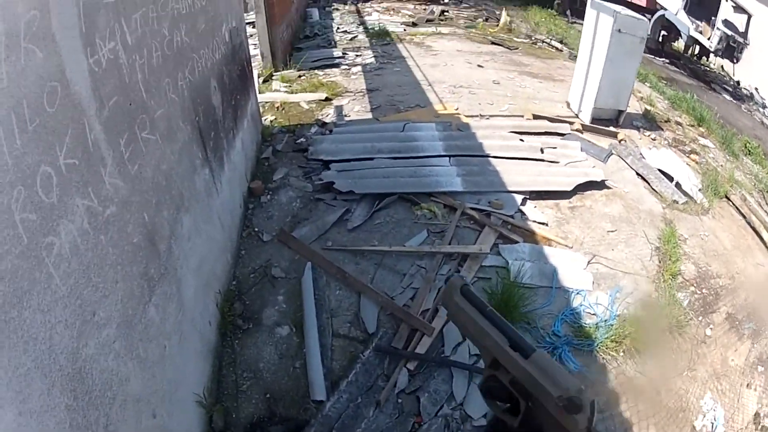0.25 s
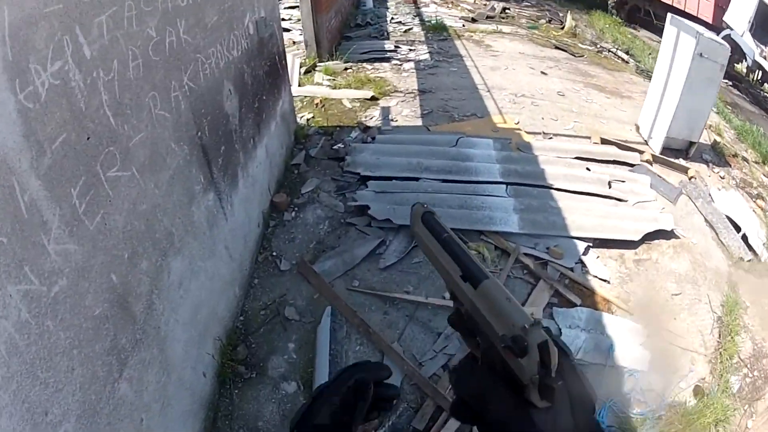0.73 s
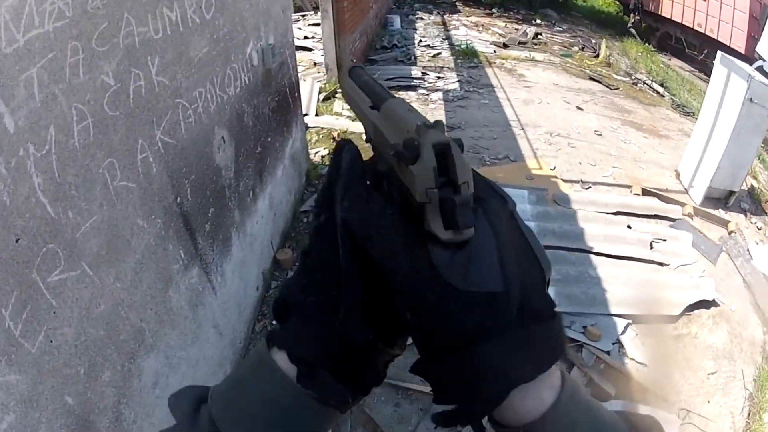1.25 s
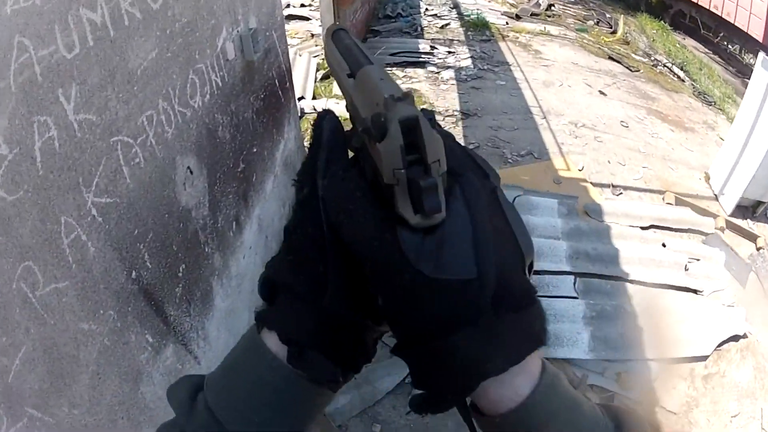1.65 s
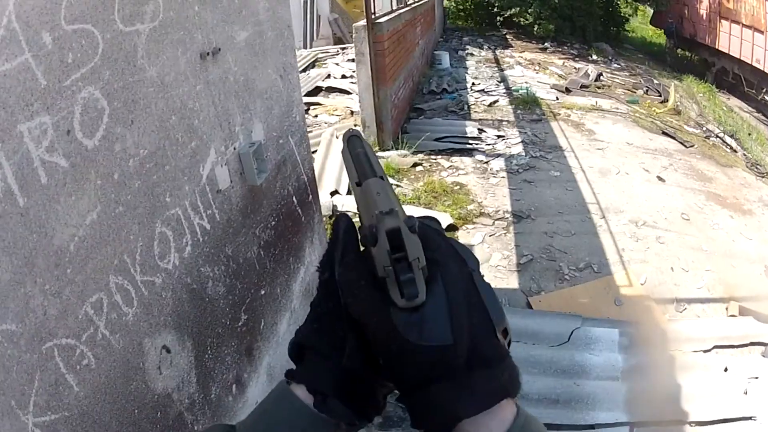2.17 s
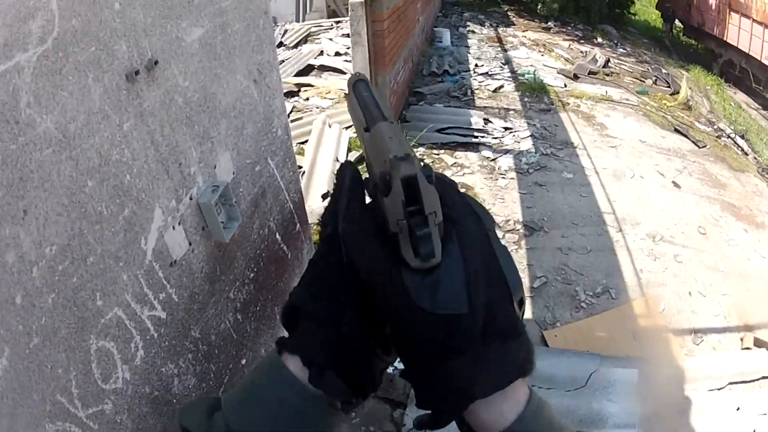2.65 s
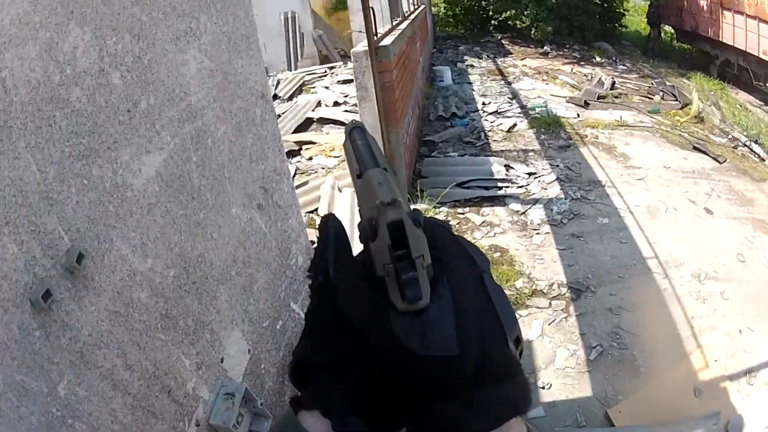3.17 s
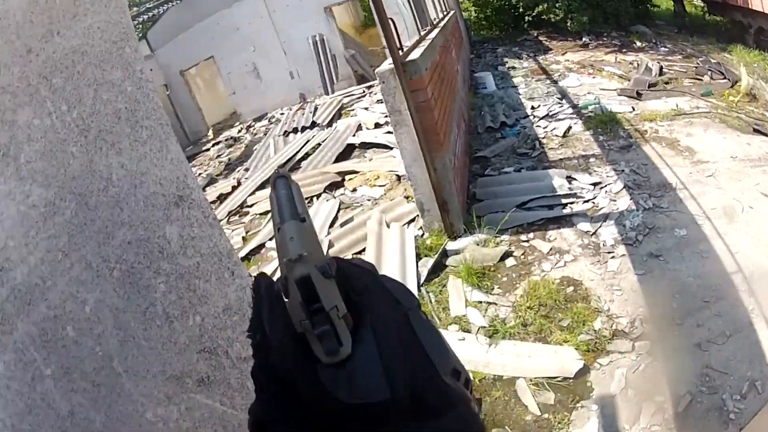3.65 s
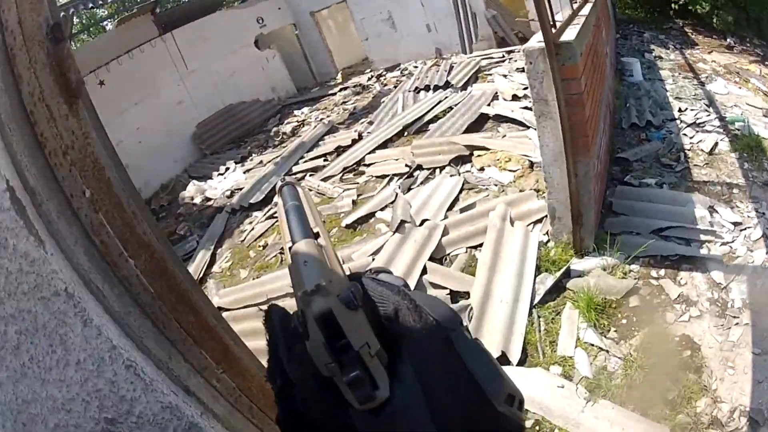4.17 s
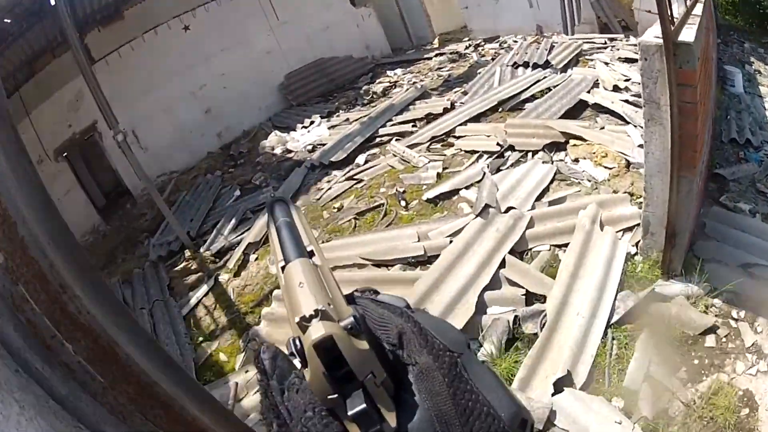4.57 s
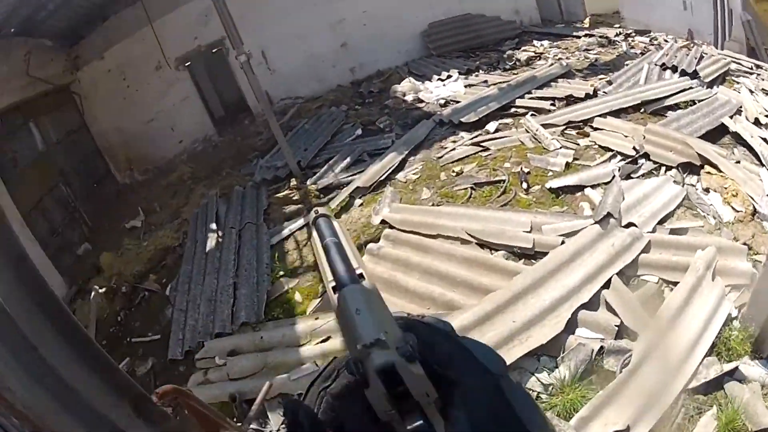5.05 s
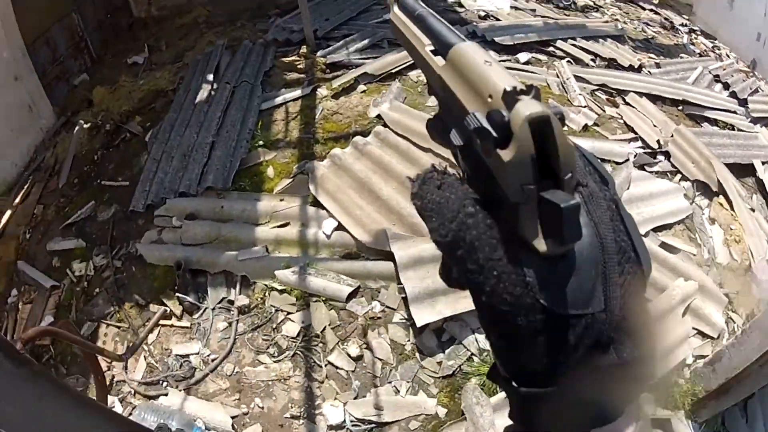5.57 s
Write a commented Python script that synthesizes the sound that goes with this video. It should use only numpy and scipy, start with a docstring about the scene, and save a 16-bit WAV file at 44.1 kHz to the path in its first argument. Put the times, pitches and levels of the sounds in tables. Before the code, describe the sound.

Someone walks slowly over broken corrugated fibre-cement sheets and rubble in an open ruin, heard from a head-worn camera. From 0.1 to 0.7 seconds there are small dry snaps, light knocks and faint grit shuffling, then a near pause. A firmer step lands around 1.4 to 1.6, with hollow mid-pitched clunks and crunching. The loudest moment comes at 2.1 to 2.4: a rapid clatter of sheets, sharp cracks and crushed grit. More knocks follow at 2.6 to 2.7 and 2.9 to 3.2, including a distinct clack near 3.15. Softer clunks at 3.6 to 3.9 give way to sparse clicks and a slight shift near 5.15. A very faint even tick, about ten a second, runs from 4.2 to the end. Low body thumps, wind rumble, distant airy noise and barely audible thin bird whistles lie beneath, with a short diffuse echo and slightly gritty treble.

```python
"""Beside a ruined wall, boots tread on loose fibre-cement sheets and rubble, heard by a head-worn camera.
Blows ring the sheets, shards crack in short noise bursts, and grit crunches as dense random clicks.
Steps thump through the body as low pulses; an even tick and thin bird whistles are faint behind them.
Shaped noise makes the distant air and the wind rumbling on the camera's housing.
The recorder holds each of its 12000 samples a second, so the sound is mirrored into the treble."""
import sys
import numpy as np
from scipy import signal
from scipy.fft import rfft, irfft, next_fast_len
from scipy.io import wavfile
from scipy.ndimage import uniform_filter1d

SR = 44100
rng = np.random.default_rng(int(sys.argv[2]) if len(sys.argv) > 2 else 0)


def log_audio(samples):
    """Write samples as a 16-bit WAV file to the path given in sys.argv[1]."""
    # one column per channel
    frames = np.atleast_2d(samples).T
    # limit to full scale, then quantise
    limited = np.clip(frames, -1, 1)
    pcm = np.round(limited * 32767).astype(np.int16)
    wavfile.write(sys.argv[1], SR, pcm)


N = 256220
FAST = next_fast_len(N)  # a length that the Fourier transform handles quickly
CRACK_RISE_S = 0.00037

# The ways a sheet can ring. Each row: pitch in Hz, relative level in dB.
SHEET_MODES = [(230, -6), (313, -3), (380, -0.5), (427, -3), (466, -1.5), (539, -4), (616, -2), (684, -2.5),
               (733, -7), (798, -8), (947, -14.5), (1115, -19.5)]
# A sole pressing into the debris. Each row: start in seconds, seconds from the start until it lets go,
# sheet rattle level in dB, grit level in dB.
SOLE_PRESSES = [(0.168, 0.045, -46.5, -65), (0.317, 0.045, -55, -58), (0.432, 0.069, -49.5, -78),
                (0.598, .1, -43.5, -60.5), (0.714, 0.12, -45.5, -56), (1.376, 0.041, -24, -54),
                (1.431, 0.075, -30.5, -46.5), (1.532, 0.04, -29.5, -35.5), (2.102, 0.018, -26, -35),
                (2.131, 0.015, -15, -21.5), (2.164, 0.076, -19.5, -53), (2.214, 0.04, -17.5, -37),
                (2.257, 0.076, -24.5, -44), (2.338, 0.047, -27, -49), (2.424, 0.062, -46, -64),
                (2.619, 0.034, -31, -49.5), (2.68, 0.078, -38, -53), (2.912, 0.055, -32.5, -42),
                (2.97, 0.056, -36, -41), (3.024, 0.15, -41.5, -61.5), (3.154, 0.029, -32.5, -49),
                (3.592, .03, -47, -64), (3.689, 0.12, -44, -64), (3.842, 0.046, -43.5, -81),
                (4.378, 0.16, -53.5, -73), (5.133, .1, -55, -68)]
# Debris shifting between the steps. Each row: time in seconds, sheet rattle level in dB, grit level in dB.
QUIET_SHUFFLE = [(0, -54.5, -73), (0.4, -51.5, -66), (0.95, -51, -66.5), (1.15, -65, -77),
                 (1.6, -58, -64.5), (1.85, -52, -66), (2.0, -64, -75), (2.5, -67, -71), (2.8, -48, -62.5),
                 (3.3, -53.5, -65.5), (3.5, -56, -68.5), (3.9, -54.5, -66.5), (4.1, -70, -71),
                 (5.0, -60, -71), (5.81, -63.5, -66.5)]


def undb(db):
    """Turns decibels into a plain gain."""
    return 10 ** (np.asarray(db) / 20)


def unit(x):
    """Scales to an rms (average strength) of 1."""
    return x / np.sqrt(np.mean(x ** 2))


def fade(t, t60):
    """Dies away exponentially, by 60 dB in t60 seconds."""
    return np.exp(-np.log(1000) * t / t60)


def colour(x, table):
    """Shapes the spectrum with a gain curve through (Hz, dB) points."""
    hz, db = np.transpose(table)
    f = np.fft.rfftfreq(FAST, 1 / SR) + 1  # 1 Hz up, to avoid the log of zero
    gain = undb(np.interp(np.log(f), np.log(hz), db))
    return irfft(rfft(x, FAST) * gain, FAST)[:N]


def band(x, hz, width_hz):
    """Rings like a single resonance, with gain 1 at its centre."""
    return signal.lfilter(*signal.iirpeak(hz, hz / width_hz, fs=SR), x)


def add(out, s, x, db):
    """Mixes x in at s seconds, with its peak at db."""
    i = int(s * SR)
    x = x[:N - i]
    out[i:i + len(x)] += x * undb(db) / np.abs(x).max()


def walk(rate):
    """Wanders smoothly between random levels, drawn rate times a second."""
    k = int(SR / rate)
    levels = rng.standard_normal(N // 64)
    held = levels[np.arange(N) // k]
    return 0.67 * uniform_filter1d(uniform_filter1d(held, k), k)


def grains(rate, spread_db):
    """Scatters random clicks, rate a second on average: most small, a few large."""
    size = undb(spread_db * rng.exponential(size=N)) * rng.standard_normal(N)
    return size * (rng.random(N) < rate / SR)


def knocks(focus=0.27, scatter_db=5.5):
    """Each blow rings the sheet modes nearest to where it lands; the top mode has its own level."""
    # Blows on the sheets. Each row: start in seconds, peak level in dB, centre of the ring in Hz,
    # top mode level in dB against the other modes summed, ring time to fall 60 dB in seconds.
    blows = [(0.127, -32.5, 552, -35, 0.033), (0.21, -36, 678, -37, 0.022), (0.35, -31, 690, -41, 0.11),
             (0.502, -32, 600, -30, 0.049), (0.598, -33, 257, -30, 0.028), (0.644, -34, 780, -20, 0.016),
             (0.657, -36, 493, -35, 0.1), (0.689, -29.5, 580, -44, .047), (0.939, -32, 393, -51, 0.059),
             (1.202, -21.5, 473, -27.5, 0.027), (1.373, -17.5, 460, -31, 0.012),
             (1.387, -12.5, 420, -32, 0.038), (1.449, -20.5, 470, -29, 0.055),
             (1.479, -22.5, 554, -29, 0.039), (1.548, -18, 515, -44, 0.028), (1.569, -31, 574, -37, 0.073),
             (1.916, -36, 523, -42, 0.043), (2.116, -10, 586, -33, 0.092), (2.136, -2, 700, -13.5, 0.068),
             (2.16, -8, 740, -27, 0.052), (2.224, -2.5, 412, -37, 0.11), (2.238, -13.5, 360, -32, 0.077),
             (2.255, -29, 446, -36, 0.11), (2.295, -23.5, 344, -39, 0.14), (2.314, -16.5, 376, -31, 0.17),
             (2.358, -8, 527, -47, 0.058), (2.384, -16, 405, -46, 0.13), (2.409, -20.5, 400, -55, 0.22),
             (2.623, -27.5, 594, -42, 0.056), (2.631, -16.5, 365, -54, 0.054), (2.69, -29, 403, -42, 0.052),
             (2.721, -19.5, 480, -45, 0.015), (2.916, -33.5, 720, -24, 0.11),
             (2.937, -18, 514, -23.5, 0.027), (2.99, -22, 950, 1, 0.023), (3.03, -33, 900, 0, 0.1),
             (3.08, -31, 490, -15, .055), (3.101, -24.5, 500, -23.5, 0.049),
             (3.154, -12, 564, -33.5, 0.048), (3.179, -22, 665, -28, 0.055),
             (3.321, -31.5, 560, -31, 0.054), (3.594, -27, 299, -42, 0.041), (3.674, -34.5, 660, -37, 0.05),
             (3.773, -20, 293, -45, 0.035), (3.866, -25.5, 640, -42, 0.018), (4.038, -37, 270, -44, 0.12),
             (4.232, -33, 649, -42, 0.036), (4.474, -40.5, 220, -19, .041), (4.708, -31, 619, -26, 0.024),
             (5.148, -31.5, 414, -49, 0.042), (5.175, -30.5, 248, -46, .042),
             (5.242, -38.5, 264, -43, 0.18)]
    rise_s = 0.0014
    out = np.zeros(N)
    t = np.arange(SR // 7) / SR
    hz, db = np.transpose(SHEET_MODES)[:, :, None]
    damping = np.r_[np.ones(len(SHEET_MODES) - 1), .7][:, None]  # the top mode rings on
    rise = 1 - np.exp(-(t / rise_s) ** 2)
    chance = rng.standard_normal((len(blows), 3, len(SHEET_MODES), 1))
    for (s, peak_db, centre, top_db, t60), (detune, gain, side) in zip(blows, chance):
        nearness = 1 / (1 + (np.log(hz / centre) / focus) ** 2)
        share = undb(db + scatter_db * gain) * nearness
        share[-1] = undb(top_db) * share[:-1].sum()
        sign = np.sign(side + .8)  # most modes start upwards, some downwards
        waves = np.sin(2 * np.pi * hz * (1 + 0.012 * detune) * t)
        ring = np.sum(sign * share * fade(t, t60) ** damping * waves, axis=0)
        add(out, s, ring * rise, peak_db)
    return out


def crack(noise, hz, high_hz, high_db, t60, rise_s, broad_db=-24.5, snap_s=0.0025, snap_db=-1.0):
    """A snap and a gritty tail of splinters, ringing two resonances of the shard."""
    t = np.arange(len(noise[0])) / SR
    grain = 60  # samples for which the tail keeps each random level
    levels = np.repeat(noise[1, :200], repeats=grain)[:len(t)]
    splinters = undb(1.8 * uniform_filter1d(levels, size=grain // 2))
    burst = noise[0] * (undb(snap_db) * np.exp(-t / snap_s) + splinters * fade(t, t60))
    burst = burst * (1 - np.exp(-t / rise_s))
    broad = band(band(burst, 2060, 2600), 2100, 2100)
    low_ring = band(burst, hz, 0.22 * hz)  # widths are shares of the pitch
    high_ring = band(burst, high_hz, 0.07 * high_hz)
    return undb(broad_db) * broad + low_ring + undb(high_db) * high_ring


def cracks():
    """Shards snap under the soles, and faint splinters crack at random moments."""
    # Each row: start in seconds, peak level in dB, low ring in Hz, high ring in Hz,
    # high ring gain in dB, tail time to fall 60 dB in seconds.
    shards = [(0.127, -47, 2100, 2890, -17, 0.17), (0.178, -38.5, 2780, 3380, -4, 0.024),
              (0.21, -28.5, 2070, 2980, -4, 0.0076), (0.2227, -47, 1910, 3020, -1, 0.017),
              (0.297, -45.5, 1990, 3530, 9, 0.022), (0.4309, -47.5, 1740, 2800, 3, .04),
              (0.4525, -50, 1820, 3670, 2, 0.031), (0.484, -27.5, 1870, 2800, -21, 0.033),
              (0.499, -38, 2330, 3470, 10, 0.03), (0.5083, -38, 2780, 3100, 6, .034),
              (0.546, -29.5, 2140, 3020, -21, 0.031), (0.593, -37, 2480, 3770, -7, 0.11),
              (0.609, -39, 1900, 3740, 1, .043), (0.6443, -44, 2220, 2930, -1, 0.032),
              (0.6685, -39.5, 2030, 2810, -15, .049), (0.9157, -48, 2670, 3110, 1, 0.045),
              (0.9413, -37.5, 1490, 3140, -3, 0.056), (1.051, -53, 2080, 3040, -1, 0.023),
              (1.206, -37.5, 2340, 3870, -9, .036), (1.372, -26, 2280, 3720, 5, 0.052),
              (1.3882, -24, 2270, 2770, -13, 0.081), (1.449, -30.5, 1380, 2770, -5, .05),
              (1.48, -31, 1350, 2770, 2, 0.11), (1.5459, -25, 2090, 3670, -7, 0.047),
              (1.5644, -27, 2350, 3800, 7, 0.019), (1.919, -30.5, 1490, 3120, 0, 0.013),
              (2.112, -18.5, 2190, 3150, -13, 0.091), (2.1403, -17, 1940, 2650, -12, 0.019),
              (2.159, -27, 2200, 2830, -8, 0.038), (2.2243, -26.5, 1900, 3530, -8, .04),
              (2.236, -29, 1930, 2970, 1, 0.052), (2.297, -38, 1980, 3950, 4, 0.064),
              (2.354, -27.5, 1400, 2840, -5, 0.048), (2.63, -29, 1980, 2950, 3, 0.075),
              (2.688, -37.5, 1540, 2980, -3, 0.11), (2.7214, -39, 1710, 2900, 14, 0.12),
              (2.925, -31.5, 1670, 3700, -7, 0.098), (2.9401, -29, 2540, 3200, -21, 0.054),
              (2.9882, -26, 2270, 2850, -19, 0.12), (3.154, -36, 1630, 3150, -19, 0.033),
              (3.248, -48.5, 2240, 3590, -20, 0.047), (3.3305, -42.5, 1990, 4130, -24, 0.048),
              (3.5984, -28.5, 1770, 2920, -11, 0.082), (3.675, -41, 1510, 3150, -19, 0.042),
              (3.751, -45, 1470, 2770, -5, 0.037), (3.7924, -38, 3030, 4470, -0.5, 0.12),
              (3.868, -46, 1344, 2830, -12, .034), (3.9938, -50, 2340, 3150, 18.5, 0.053),
              (4.121, -43.5, 2150, 3200, -24, .032), (4.3652, -48.5, 1340, 3060, 3, 0.035),
              (4.409, -53.5, 2700, 3670, 3, .03), (4.4317, -49, 1980, 3080, 17, 0.046),
              (4.6736, -38.5, 2260, 3840, 3, 0.014), (4.7095, -38, 1750, 2880, -19, .015),
              (5.149, -44.5, 2050, 2810, -4, 0.031), (5.402, -47, 2070, 4400, 4.5, .035)]
    splinters_per_s, loudest_splinter_db = 4, -52
    out = np.zeros(N)
    for (s, db, *shape), noise in zip(shards, rng.standard_normal((len(shards), 2, SR // 10))):
        add(out, s, crack(noise, *shape, CRACK_RISE_S), db)
    count = int(splinters_per_s * N / SR)
    length = SR // 20
    chance = rng.random((count, 3))
    for (when, weakness, pitch), noise in zip(chance, rng.standard_normal((count, 2, length))):
        splinter = crack(noise, 1400 + 1300 * pitch, 3700 - 800 * pitch, 0.5, 0.011, CRACK_RISE_S)
        add(out, when * (N - length) / SR, splinter, loudest_splinter_db - 8 * weakness)
    return out


def pressure(levels_db, shuffle_db, release_s):
    """Each press swells, holds and lets go; the powers add up over the quiet shuffling."""
    press_s = 0.017
    t = np.arange(N) / SR
    power = undb(np.interp(t, np.transpose(QUIET_SHUFFLE)[0], shuffle_db)) ** 2
    for (s, hold, *_), db in zip(SOLE_PRESSES, levels_db):
        swell = np.clip((t - s) / press_s, 0, 1)
        let_go = np.exp(-np.maximum(t - s - hold, 0) / release_s)
        power = power + (undb(db) * swell * let_go) ** 2
    return np.sqrt(power)


def crunch():
    """Crushed grit crackles, and the same grains set the sheets rattling."""
    # The tone of the grit. Each row: frequency in Hz, relative gain in dB.
    grit_tone = [(300, -37), (800, 3), (1300, 4.5), (2200, 6.5), (3000, 1), (4000, -0.5), (4600, -16),
                 (5300, -18.5), (6000, -35)]
    _, _, rattle_db, grit_db = np.transpose(SOLE_PRESSES)
    _, quiet_rattle_db, quiet_grit_db = np.transpose(QUIET_SHUFFLE)
    t = np.arange(N) / SR
    crush = grains(700, 2.9)

    rattle = 0
    for k, (hz, db) in enumerate(SHEET_MODES[:-1]):
        rattle = rattle + (-1) ** k * undb(db) * band(crush, hz, 45.)
    # the rattle stays dull, with little above 1.6 kHz
    rattle = signal.sosfilt(signal.butter(2, 1600., fs=SR, output="sos"), rattle)

    # fine grains are short puffs of noise
    clicks = np.abs(crush) + 0.51 * np.abs(grains(2000, 1.0))
    puffs = np.convolve(clicks, fade(t[:500], 0.015))[:N]
    hiss = puffs * rng.standard_normal(N)
    # chips of each size clink at their own pitch, five pitches to the octave
    chips = 0
    for hz in 950 * 2 ** (np.arange(13) / 5):
        chips = chips + unit(band(grains(400, 2.6), hz, 0.052 * hz)) * np.sqrt(hz)
    grit = colour(unit(hiss) + undb(0.5) * unit(chips), grit_tone)

    return (unit(rattle) * pressure(rattle_db, quiet_rattle_db, release_s=0.014)
            + unit(grit) * pressure(grit_db, quiet_grit_db, release_s=0.015))


def thumps():
    """Steps carried up the body are low sine waves that swell and fade smoothly."""
    # Each row: start in seconds, peak level in dB, pitch in Hz, length in seconds.
    body_steps = [(1.366, -32, 128, 0.08), (1.44, -40, 58, 0.13), (2.117, -31, 43.1, 0.04),
                  (2.229, -50, 160, 0.059), (2.624, -24.5, 120, 0.021), (2.867, -32.5, 89, 0.048),
                  (3.645, -39, 56.7, 0.099), (3.702, -33, 74.4, 0.072), (3.769, -27, 156, 0.024),
                  (5.168, -47, 76, 0.056)]
    out = np.zeros(N)
    for s, db, hz, length in body_steps:
        t = np.arange(0, length, 1 / SR)
        add(out, s, np.sin(2 * np.pi * hz * t) * np.hanning(len(t)), db)
    return out


def ticks():
    """A faint dry tick repeats evenly to the end, each a noise burst ringing like a crack."""
    start_s, period_s, peak_db = 4.217, 0.1053, -50.5
    out = np.zeros(N)
    times = np.arange(start_s, N / SR, period_s)
    for s, noise in zip(times, rng.standard_normal((len(times), 2, SR // 20))):
        add(out, s, crack(noise, 2280, 3700, -0.12, 0.033, 0.00028), peak_db)
    return out


def bird():
    """Faint distant notes are gliding sine whistles, their level roughened by distance."""
    # Each row: start in seconds, length in seconds, start pitch in Hz, middle pitch in Hz,
    # end pitch in Hz, peak level in dB before the roughening.
    notes = [(0.333, 0.053, 4200, 4470, 4250, -56.5), (0.367, 0.051, 4250, 3930, 3450, -66),
             (2.93, 0.028, 4870, 4800, 4700, -50), (3.609, 0.055, 4550, 4660, 4500, -59),
             (4.54, 0.059, 3130, 3420, 3380, -66), (4.641, .03, 3310, 3200, 3200, -62.5),
             (4.74, 0.069, 3950, 4010, 4020, -83), (5.686, 0.035, 4480, 4470, 4450, -67)]
    out = np.zeros(N)
    for s, length, *hz, db in notes:
        t = np.arange(0, 1, 1 / (SR * length))  # 0 to 1 through the note
        pitch = np.interp(t, [0, .5, 1], hz)
        note = np.sin(2 * np.pi * np.cumsum(pitch) / SR)
        add(out, s, note * np.sin(np.pi * t), db)
    return out * undb(4. * walk(200))


def air():
    """Far noise in octave bands that swell together and flicker alone, over the wind's rumble."""
    # The tone of the far noise. Each row: frequency in Hz, relative gain in dB.
    air_tone = [(25, -10.5), (55, -9.5), (92, -6), (227, -9), (309, -15.5), (600, -13.5), (1290, -34.5),
                (2200, -35), (3840, -34), (5120, -36), (6500, -45)]
    # Wind on the housing. Each row: time in seconds, rumble level in dB.
    wind = [(0.0, -70), (0.11, -54), (1.41, -44), (1.52, -41), (1.62, -50), (2.09, -59), (2.15, -41),
            (2.18, -56), (2.72, -58), (2.9, -42), (3.09, -68), (3.62, -68), (3.66, -45), (4.01, -58.5),
            (5.37, -56), (5.81, -55.5)]
    air_db = -53
    spectrum = rfft(colour(rng.standard_normal(N), air_tone), FAST)
    swell = walk(0.58)
    far = 0
    octaves_up = np.log2(np.fft.rfftfreq(FAST, 1 / SR) / 50 + 1e-9)  # counted from 50 Hz
    for octave in range(8):
        overlap = np.clip(1 - np.abs(octaves_up - octave), 0, 1)
        part = irfft(spectrum * overlap, FAST)[:N]
        far = far + part * undb(1.4 * swell + 1.04 * walk(6.2))
    rumble = colour(rng.standard_normal(N), [(8, -34), (20, -6.5), (36, 12), (55, -9.5), (90, -39.5)])
    wind_db = np.interp(np.arange(N) / SR, *np.transpose(wind))
    return unit(far) * undb(air_db) + unit(rumble) * undb(wind_db)


def scene():
    """Mixes the steps and their short echo with the body thumps and the background."""
    steps = knocks() + cracks() + crunch()
    t = np.arange(SR // 5) / SR
    # the wall and the heaps around throw back a short diffuse tail, after 4 ms
    tail = unit(rng.standard_normal(len(t)) * fade(t, 0.15) * (t > .004)) / np.sqrt(len(t))
    yard = undb(-16.0) * signal.fftconvolve(steps, tail)[:N]
    return (steps + yard + thumps() + ticks() + bird() + air())[None]


def record(dry):
    """Holding each sample mirrors the sound around the hold rate and weakens its treble."""
    hold_hz, top_hz = 12000, 15300
    low = signal.sosfilt(signal.butter(8, 5200., fs=SR, output="sos"), dry)
    # the cosine makes the mirror image, the sinc curve the treble droop
    sampled = low * (1 + 2 * np.cos(2 * np.pi * hold_hz * np.arange(N) / SR))
    droop = np.sinc(np.fft.rfftfreq(FAST, 1 / SR) / hold_hz)
    held = irfft(rfft(sampled, FAST) * droop, FAST)[:, :N]
    return signal.sosfilt(signal.ellip(8, .2, 70, top_hz, fs=SR, output="sos"), held)


dry = scene()
out = record(dry)
log_audio(out)
```